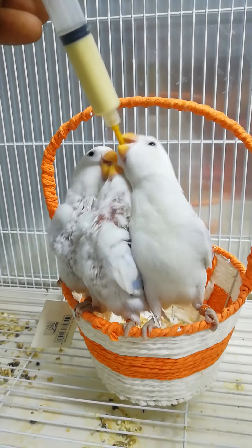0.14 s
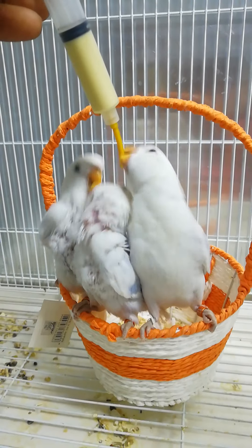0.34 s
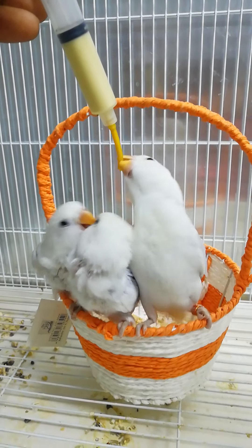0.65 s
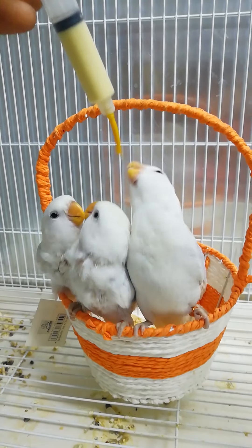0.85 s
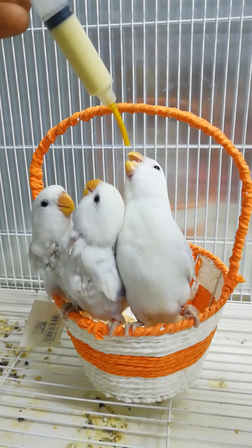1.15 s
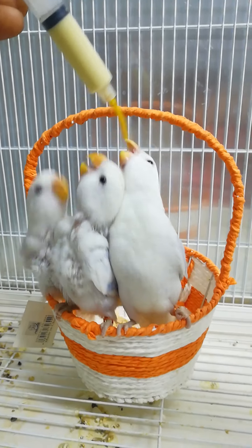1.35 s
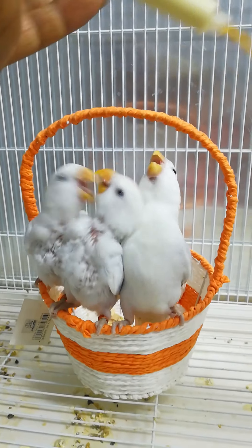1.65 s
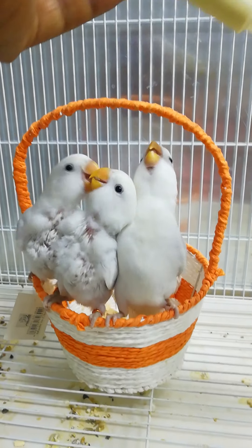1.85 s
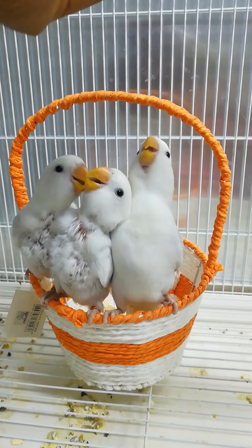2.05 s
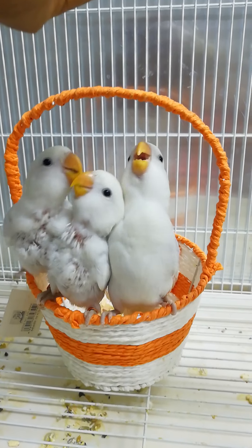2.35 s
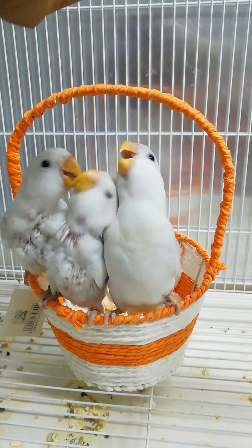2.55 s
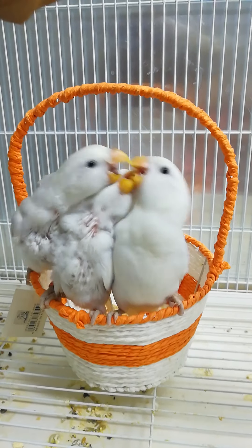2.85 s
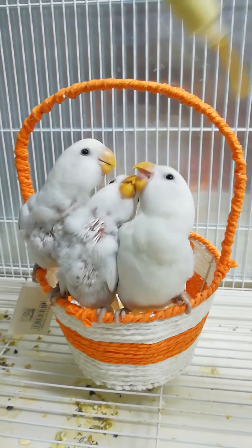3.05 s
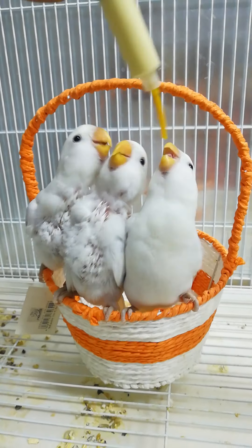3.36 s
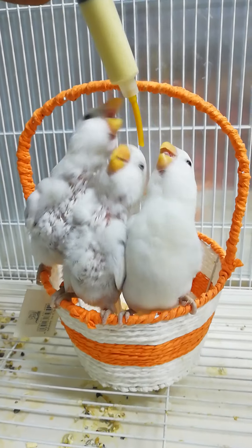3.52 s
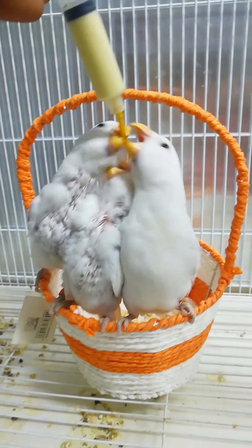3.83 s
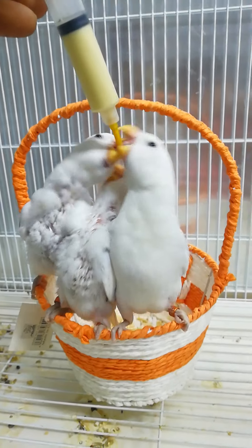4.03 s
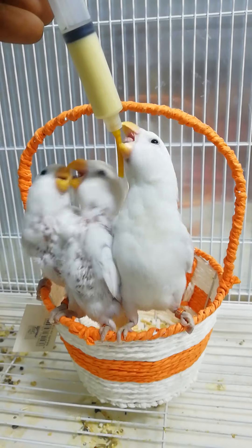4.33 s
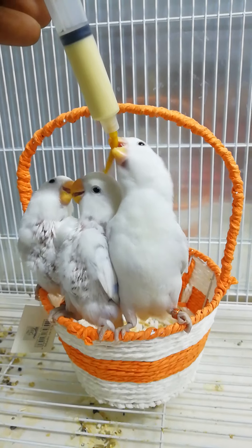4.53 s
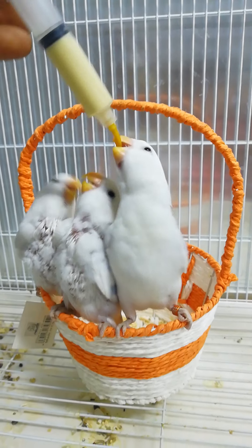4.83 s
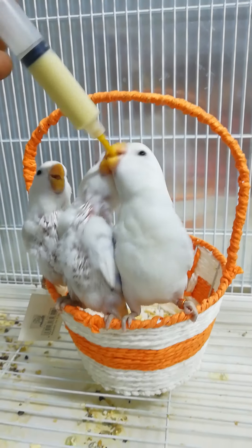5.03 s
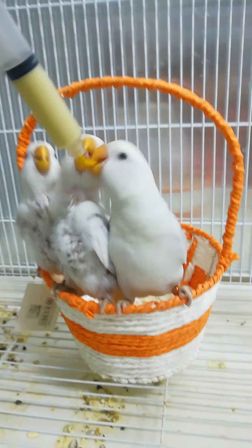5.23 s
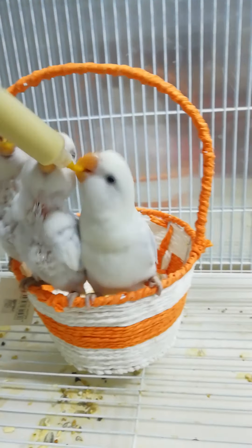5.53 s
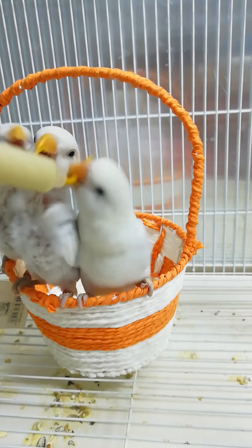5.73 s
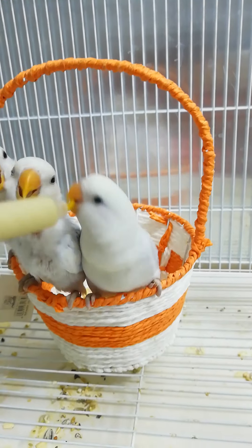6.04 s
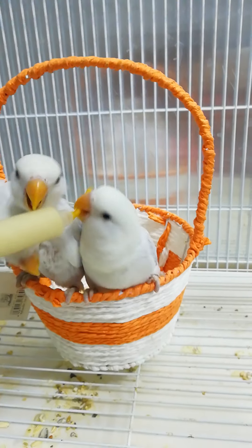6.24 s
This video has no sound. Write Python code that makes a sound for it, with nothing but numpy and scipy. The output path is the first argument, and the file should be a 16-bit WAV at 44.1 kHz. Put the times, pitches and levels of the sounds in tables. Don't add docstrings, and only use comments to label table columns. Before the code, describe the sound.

Close stereo phone pickup of lovebird chicks begging in a wire cage in a small, hard room, over faint hiss and low mains rumble. A thin rising peep opens at 0 s with a few tiny claw ticks on wicker. From 0.23 to 1.5 s nest mates give quick falling chirps every 0.2 s, while a nearer chick starts rasping from about 0.6 s. A short lull near 1.8 s holds only small peeps. From 2 to 3.4 s the rasps become loud, rough and cracking, joined by a harsh squawk and, at 3.0-3.4 s, a swooping then zigzag scream. More rasps and chirps follow at 3.7-4.2 s, then a sparse gap until 4.8 s. Strong climbing squeals hit at 5.1 and 5.5 s, a piercing scream slightly left at 5.7 s, and high squeals with harsh rasps at 5.9-6.15 s. Soft low wing puffs come near 2.55, 3.4 and 5.2 s; a faint blip ends it.

```python
import sys
import numpy as np
from scipy import signal
from scipy.fft import rfft, irfft, next_fast_len
from scipy.io import wavfile
from scipy.ndimage import map_coordinates

SR = 44100
rng = np.random.default_rng(int(sys.argv[2]) if len(sys.argv) > 2 else 0)


def bounce(signal):
    frames = np.transpose(np.atleast_2d(signal))
    limited = np.clip(frames, -1, 1)
    pcm = np.round(limited * 32767).astype(np.int16)
    wavfile.write(sys.argv[1], SR, pcm)


def makeup_ratio(level_db):
    decades = np.asarray(level_db, float) / 20
    return 10 ** decades


N = 281358


def unit(x):
    return x / np.sqrt(np.mean(x ** 2) + 1e-20)


def along(points, hz):
    f, v = np.transpose(points)
    return np.interp(np.log(hz + 1), np.log(f + 1), v)


def wobble(n, rate_hz):
    return map_coordinates(rng.standard_normal(1000), [np.arange(n) * rate_hz / SR])


def room_noise(spectrum, db):
    # frequency in Hz, left-right likeness 0-1.
    alike = [(30, .9985), (90, .993), (180, .84), (400, .1)]
    m = next_fast_len(N + 8192)
    hz = np.fft.rfftfreq(m, 1 / SR)
    turn = np.arccos(np.clip(along(alike, hz), -1, 1)) / 2
    spectra = rfft(rng.standard_normal((2, m))) * makeup_ratio(along(spectrum, hz))
    mid, side = irfft(spectra * [np.cos(turn), np.sin(turn)])[:, :N]
    return makeup_ratio(db) * unit(np.array([mid + side, mid - side]))


def played(rows, rise, fall):
    s, *cols = np.transpose(rows)
    s = np.where(np.diff(s, prepend=-1) < .009, np.roll(s, 1) + .0004, s)
    end = s[-1] + fall
    t = np.arange(round(s[0] * SR), round(end * SR)) / SR
    gate = np.clip(np.minimum((t - s[0]) / rise, (end - t) / fall), 0, 1)
    return round(s[0] * SR), [np.interp(t, s, c) for c in cols], gate


def add(mix, start, x, cage_db, room_db, pan_db, lead):
    # frequency in Hz, time to fall 60 dB in seconds.
    ring = [(2000, 0.2), (5500, 0.17), (12000, 0.14)]
    hz, t, z = signal.stft(rng.standard_normal((2, SR // 4)), SR, nperseg=256)
    tail = signal.istft(z * makeup_ratio(-60 * t / along(ring, hz)[:, None]), SR, nperseg=256)[1]
    cage = rng.standard_normal((2, 600)) * makeup_ratio(-60 * np.arange(600) / SR / .015)
    paths = makeup_ratio(room_db) * np.pad(tail / np.linalg.norm(tail[0]), ((0, 0), (150, 0)))
    paths[:, 60:660] += makeup_ratio(cage_db) * cage / np.linalg.norm(cage[0])
    paths[[0, 1], [40, 40 + int(lead)]] = 1
    heard = signal.fftconvolve(x[None], paths, axes=1)[:, 40:][:, :N - start]
    mix[:, start:start + heard.shape[1]] += heard * makeup_ratio([[pan_db / 2], [-pan_db / 2]])


def squeal_calls():
    # start in seconds, length in seconds, first Hz, last Hz, level in dB.
    peeps = [
        (0, 0.14, 1125, 1337, -42.5),
        (.165, 0.074, 1783, 1820, -52),
        (1.768, 0.054, 1136, 2300, -37.5),
        (3.478, 0.16, 1234, 1126, -39),
        (5.467, 0.044, 2630, 2340, -32),
    ]
    # start in seconds, top in Hz, level in dB, hold in seconds, knee overtones in dB.
    chirps = [(0.232, 2844, -34, .015, 3.5), (0.46, 2948, -31.5, 0.00061, -16),
              (0.673, 2758, -31, 0.0014, 0), (0.874, 3070, -32.5, 0.0054, -11),
              (1.074, 3055, -29.5, 0.0058, -11.5), (1.272, 2926, -32, 0.0011, -13),
              (1.493, 2937, -32, 0.0056, -4), (3.668, 2990, -31, 0.0008, -8.5),
              (4.181, 2630, -32, 0.02, -15), (4.945, 2346, -29.5, .03, -10.5),
              (5.325, 2725, -31, 0.025, -23)]
    # start in seconds, length in seconds, first Hz, last Hz, level in dB.
    climbs = [
        (5.09, .135, 2300, 3380, -23.5),
        (5.5, 0.12, 2160, 3420, -22),
        (.62, 0.064, 1700, 2430, -37),
        (1.94, .11, 1060, 1310, -42.5),
        (5.715, 0.11, 1070, 1340, -43.5),
        (1.0, 0.084, 1030, 1130, -45),
        (2.27, .16, 1470, 1170, -45.5),
        (5.8, 0.061, 1400, 2070, -45.5),
    ]
    # start in seconds, length in seconds, first Hz, last Hz, level in dB.
    squawks = [
        (2.135, 0.22, 2410, 2677, -31),
        (2.28, .05, 2350, 2134, -41),
        (5.94, 0.09, 2582, 3054, -34),
        (6.07, 0.074, 3200, 2400, -38.5),
    ]
    # rows of share of length, share of glide, level in dB, overtones in dB; then roughness 0-1, left-right dB.
    peep_shape = ([(0, 0, -1, -5.5), (.35, .4, -3, -18.5), (1, 1, -28, -14)], (0.21, -1.5))
    climb_shape = ([(0, 0.096, -9, -9), (.3, 0.51, -0.4, -23), (.7, 0.94, -0.5, -23.5), (1, 1, -9, -27)],
                    (0.15, -2.2))
    squawk_shape = ([(0, 0, -6, 7.8), (.35, 0.52, -2, 6.5), (.75, 1, -6, 5.5), (1, 0.93, -16.5, 7.5)],
                     (.48, -1))
    # overtones in dB, roughness 0-1, left-right dB; then rows of seconds, pitch in Hz, level in dB.
    screams = [
        ((-18.5, 0.3, -2), [(3.005, 1378, -37.5), (3.05, 1860, -33.5), (3.1, 2497, -29.5), (3.13, 2538, -28), (3.2, 2252, -27), (3.27, 2620, -32.5)]),
        ((-14, 0.27, -.6), [(3.287, 4210, -25.5), (3.325, 3910, -32), (3.337, 3320, -25.5), (3.37, 3390, -28.5), (3.395, 3933, -21.5), (3.44, 3850, -61)]),
        ((-11, 0.067, 5.8), [(5.655, 3490, -19), (5.68, 2820, -25), (5.695, 3450, -22), (5.715, 4373, -21.5), (5.73, 3432, -19), (5.78, 3460, -19)]),
        ((-18, 0.19, 2.1), [(6.0, 3700, -20.5), (6.03, 3805, -27.5), (6.06, 3800, -31)]),
        ((-22, 0.44, 2), [(6.06, 4164, -30), (6.1, 4392, -32), (6.14, 4160, -26)]),
        ((-4.5, 0.39, 1.4), [(1.933, 1380, -49), (1.955, 1610, -40.5), (2.11, 1590, -40)]),
        ((-13, 0.24, -1.7), [(3.96, 1230, -37), (4.0, 1596, -47), (4.02, 2175, -25), (4.07, 2150, -40), (4.13, 2380, -75)]),
    ]
    calls = []
    perch_s, drop_s, slide_s, knee_hz, foot_hz = 0.019, 0.026, .031, 1898, 1160
    corner_db = np.array([-12.5, 2, -1, -5.5, -12.5])
    corner_over_db = np.array([-17.5, -10.5, 1.9, -5, -12])
    for s, top_hz, db, hold, over_db in chirps:
        times = s + np.cumsum([0, perch_s, drop_s, .01 + abs(hold), slide_s - .01])
        hz = [top_hz, top_hz, knee_hz, 0.93 * knee_hz, foot_hz]
        rows = np.transpose([times, hz, db + corner_db, over_db + corner_over_db])
        calls.append((rows, (.22, -1.5)))
    for table, (shape, mood) in [(climbs, climb_shape), (peeps, peep_shape), (squawks, squawk_shape)]:
        for s, long, first_hz, last_hz, db in table:
            glide_hz = last_hz - first_hz
            rows = [(s + u * long, first_hz + g * glide_hz, db + d, over) for u, g, d, over in shape]
            calls.append((rows, mood))
    for (over_db, *mood), rows in screams:
        calls.append(([(*row, over_db) for row in rows], mood))
    return calls


def squeals():
    mix = np.zeros((2, N))
    for rows, (rough, pan_db) in squeal_calls():
        start, (hz, db, over_db), gate = played(rows, rise=0.0013, fall=0.011)
        n = len(hz)
        unsteady = 1 + 0.0114 * wobble(n, 89.63) + 0.135 * rough * wobble(n, 900)
        turn = 2 * np.pi * np.cumsum(hz * unsteady) / SR
        voice = np.sin(turn)
        for k in range(2, 7):
            overtone = makeup_ratio(over_db - (27 - 36 * rough) * (k - 2)) * np.sin(k * turn)
            voice += overtone * (k * hz < SR / 2.2)
        flutter = makeup_ratio(9.5 * rough * np.clip(wobble(n, 350), -3, 1.6))
        close = pan_db > 3
        add(mix, start, voice * flutter * makeup_ratio(db - 1.5) * gate, cage_db=-3,
            room_db=-7 if close else 3, pan_db=pan_db, lead=9 if close else 25)
    return mix


def claw_ticks():
    # time in seconds, peak level in dB.
    taps = [
        (0.0428, -45),
        (0.1347, -54.5),
        (0.4394, -65),
    ]
    mix, t = np.zeros((2, N)), np.arange(4400) / SR
    for s, db in taps:
        click = np.diff(rng.standard_normal(len(t) + 1)) * makeup_ratio(db + 1.5 - 60 * t / 0.002)
        add(mix, round(s * SR), click, cage_db=-8.5, room_db=-21.0, pan_db=-4.0, lead=3)
    return mix


def rasp_calls():
    # start in seconds, length in seconds, pulse rate in Hz, level in dB, final roughness 0-1.
    chest = [(0.763, .088, 612.4, -31.5, .6), (0.922, 0.022, 1022, -31.5, 0.44),
             (0.999, .099, 923, -35.5, 0.8), (1.584, .082, 1046, -34.5, 0.54),
             (1.671, 0.076, 616, -33, 0.74), (2.125, .177, 982.4, -26.5, 0.89),
             (2.52, .048, 484.5, -28.5, 0.11), (2.857, .147, 1072, -28.5, 1.06),
             (3.756, .13, 974.7, -25.5, 0.38), (4.494, 0.022, 508, -43, 0), (4.852, .04, 980.5, -28, 0.14),
             (4.958, 0.066, 934, -33.5, 1), (5.093, 0.055, 970, -37, .7), (5.334, .04, 998, -36.5, 0.19),
             (5.729, .103, 1056, -34.5, 1), (5.967, 0.1, 957, -25.5, 0.87)]
    # start in seconds, length in seconds, pulse rate in Hz, opening dB, change in dB.
    chaos = [(.607, 0.14, 1018, -40, 9.5), (1.1, .065, 1090, -36.5, -13), (2.57, .078, 952.5, -30.5, 3.8),
             (2.668, .099, 962.4, -27, -0.5), (3.0, 0.095, 936, -28.5, -3.5), (3.188, 0.086, 995, -35, 5),
             (3.28, 0.042, 1015, -25.5, -7), (2.36, 0.061, 1231, -27.5, -3.5), (2.77, .027, 1348, -35, 5),
             (3.352, .045, 1919, -36.5, -9), (3.885, .072, 1083, -28.5, -3.5),
             (4.296, 0.025, 997.5, -34.5, -10), (5.153, 0.064, 970, -32.5, -8),
             (5.652, 0.052, 1192, -42, -4), (6.078, 0.057, 1019, -27, -13)]
    # start in seconds, length in seconds, pulse rate in Hz, opening dB, change in dB.
    head = [
        (2.095, .028, 2070, -25, 2.5),
        (2.305, 0.053, 2074, -21.5, -8.5),
        (3.32, 0.026, 1996, -26.5, -8),
        (3.718, .032, 2036, -24, 4.5),
        (4.895, 0.057, 1830, -26, 2.3),
        (5.937, .026, 1983, -27, 5.5),
    ]
    # start in seconds, length in seconds, pulse rate in Hz, opening dB, change in dB.
    openers = [
        (.558, 0.0091, 1497, -48, 13),
        (.59, .015, 1512, -41, -7),
        (2.037, .034, 1361, -31.5, -1),
        (2.65, .016, 1256, -25.5, 1),
        (3.662, 0.017, 1259, -32, 4.5),
        (3.682, .021, 1478, -35.5, 0),
        (4.788, .025, 1225, -31.5, -1),
        (5.898, 0.024, 1343, -33, 8.5),
        (6.367, 0.011, 1079, -45.5, 9.5),
    ]
    # start in seconds, length in seconds, first Hz, last Hz, level in dB.
    swoops = [(0.851, 0.032, 1994, 2220, -31), (0.882, 0.016, 2220, 2950, -33),
              (0.898, .024, 2985, 1950, -28.5), (1.449, 0.03, 1320, 1824, -36),
              (2.074, 0.023, 2025, 2152, -29), (2.8, 0.051, 2054, 1872, -27),
              (3.702, 0.013, 1947, 2068, -27.5), (4.815, .036, 1334, 2092, -36),
              (5.385, .035, 1073, 1194, -32), (5.42, 0.021, 1194, 1028, -34),
              (5.925, .012, 1698, 1920, -24.5)]
    notes = []
    for s, long, hz, db, rough in chest:
        notes.append((s, long, hz, db, 0, .45 * rough, rough, -.025))
    for table, rough, glide in [(chaos, .76, -.02), (head, .24, -.02), (openers, .2, .03)]:
        notes += [(*row, rough, rough, glide) for row in table]
    for s, long, a, b, db in swoops:
        notes.append((s, long, (a + b) / 2, db, 0, .24, .24, 2 * (b - a) / (a + b)))
    calls = []
    for s, long, hz, db, change_db, first, last, glide in sorted(notes):
        if not calls or s - calls[-1][-1][0] > .012:
            calls.append([])
        opening = (s, hz * (1 - glide / 2), db, first)
        closing = (s + long, hz * (1 + glide / 2), db + change_db, last)
        calls[-1] += [opening, closing]
    return calls


def causal(points):
    cep = irfft(np.log(makeup_ratio(along(points, np.fft.rfftfreq(2048, 1 / SR)))))
    cep[1:1024] *= 2
    cep[1025:] = 0
    return irfft(np.exp(rfft(cep)))[:1024]


def rasps():
    # frequency in Hz, gain in dB.
    throat_gain = [(420, -46), (650, -25), (1000, -18), (1900, -8), (2400, -10), (2900, -2), (3800, -8),
                   (4900, 0), (5600, -7), (6300, -10), (7400, -23), (10600, -37), (13000, -35),
                   (15600, -48)]
    # frequency in Hz, gain in dB.
    soft_gain = [(1000, 0.5), (3000, -4), (5000, -8), (11000, -40.5)]
    mix, throat, soft = np.zeros((2, N)), causal(throat_gain), causal(soft_gain)
    taps = np.arange(-8, 9)
    for rows in rasp_calls():
        start, (hz, db, rough), gate = played(rows, rise=.0015, fall=.003)
        n = len(hz)
        wander = .012 * wobble(n, 110) + .06 * rough * wobble(n, 35) + .035 * rough * wobble(n, 300)
        cycles = np.cumsum(hz * (1 + wander)) / SR
        when = np.interp(np.arange(int(cycles[-1])), cycles, np.arange(n))
        at = when.astype(int)
        chance = rng.standard_normal((2500, 2))[:len(when)]
        scatter = (.011 + .11 * rough[at] ** 3) * chance[:, 0] * SR / hz[at]
        when = np.clip(when + 20 + scatter, 9, n)
        size = makeup_ratio((.4 + 3.5 * rough[at]) * chance[:, 1]) / np.sqrt(hz[at])
        size *= 1 + 0.27 * rough[at] * (-1) ** np.arange(len(when))
        spot = when.astype(int)[:, None] + taps
        shape = np.sinc(spot - when[:, None]) * np.hanning(19)[1:-1] * size[:, None]
        puffs = np.bincount(spot.ravel(), shape.ravel(), n + 40)[20:n + 20]
        loud = signal.fftconvolve(puffs, throat)[:n]
        dull = signal.fftconvolve(loud, soft)[:n]
        effort = np.clip((db + 46.5) / 22 + 0.24 * wobble(n, 30.3), 0, 1)
        voice = effort * unit(loud) + (1 - effort) * unit(dull)
        add(mix, start, voice * makeup_ratio(db - 1.5) * gate, cage_db=-2, room_db=-8, pan_db=1, lead=9)
    return mix


def wing_flaps():
    # time in seconds, level in dB, pitch of the puff in Hz.
    beats = [
        (2.55, -49.5, 342),
        (3.399, -52.5, 268),
        (5.219, -56, 183),
    ]
    mix, n = np.zeros((2, N)), 4400
    for s, db, hz in beats:
        band = signal.butter(1, [hz * 0.617, hz * 3.1], "bandpass", fs=SR)
        puff = unit(signal.lfilter(*band, rng.standard_normal((2, n)))) * np.hanning(n)
        mix[:, round((s - .05) * SR):][:, :n] += makeup_ratio(db) * puff
    return mix


def scene():
    # frequency in Hz, level in dB per Hz.
    hiss = [(60, -33), (100, -0.5), (300, -10.5), (700, -11.5), (1700, -13.5), (4000, -18.5), (9000, -25),
            (15600, -45)]
    # frequency in Hz, level in dB per Hz.
    rumble = [(10, -4), (22, 6.5), (32, -14), (50, -16.5), (66, 5), (80, -22.5), (110, -40.5)]
    room = room_noise(hiss, db=-63.5) + room_noise(rumble, db=-61.0)
    return room + squeals() + claw_ticks() + rasps() + wing_flaps()


def low_pass(x):
    return signal.sosfilt(signal.butter(12, 15700, fs=SR, output="sos"), x)


def record(dry):
    band = signal.cheby2(12, 50, 16250, fs=SR, output="sos")
    return low_pass(signal.sosfiltfilt(band, dry))


dry = scene()
out = record(dry)
bounce(out)
```